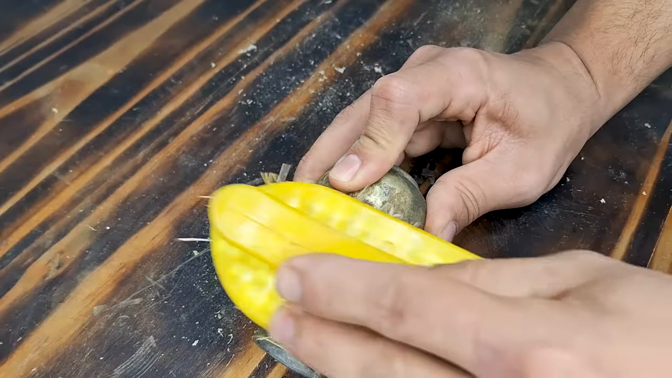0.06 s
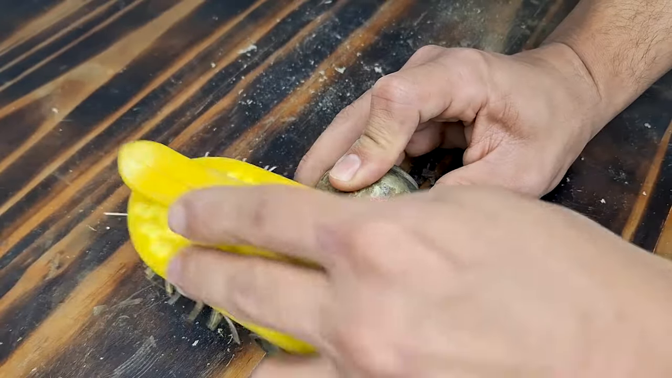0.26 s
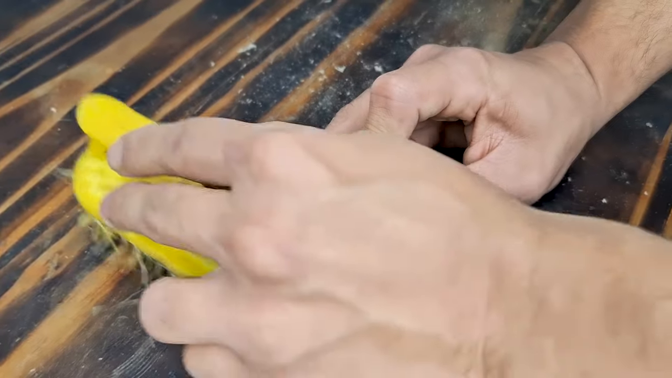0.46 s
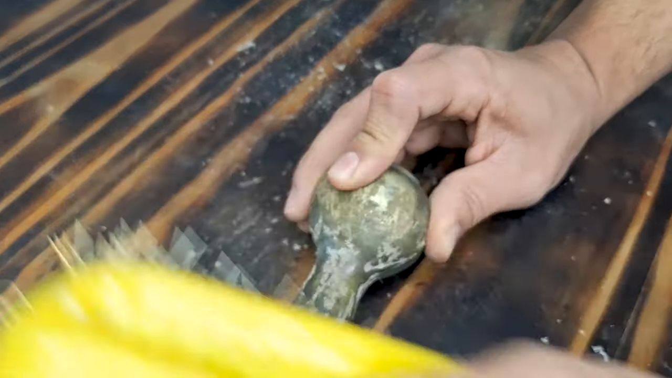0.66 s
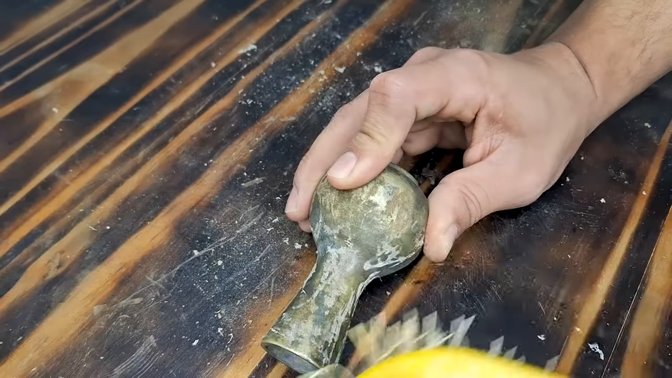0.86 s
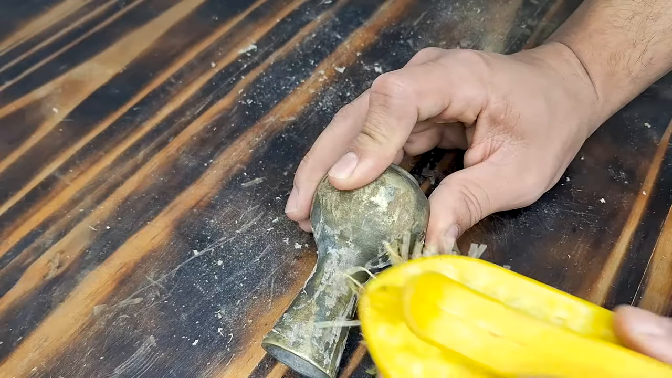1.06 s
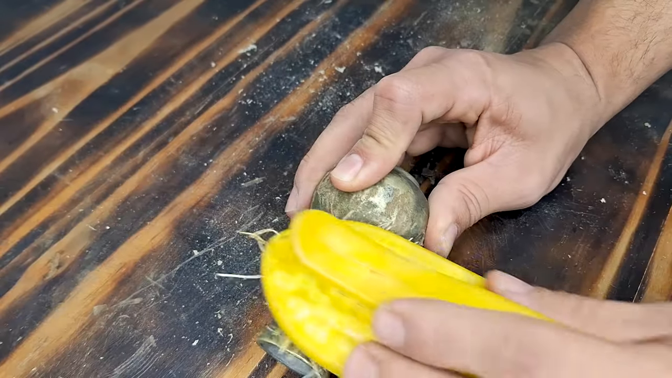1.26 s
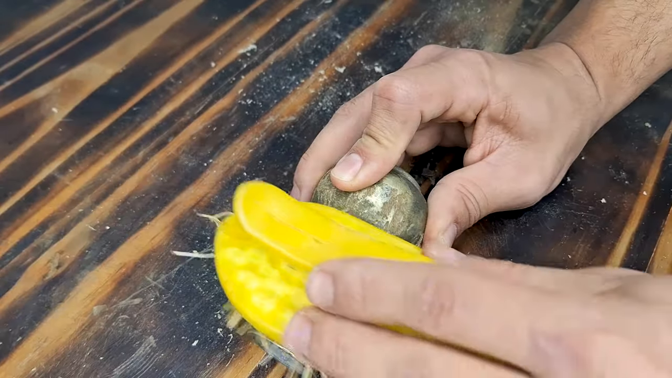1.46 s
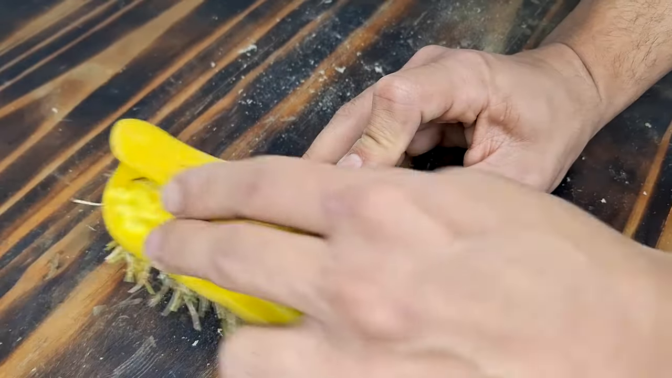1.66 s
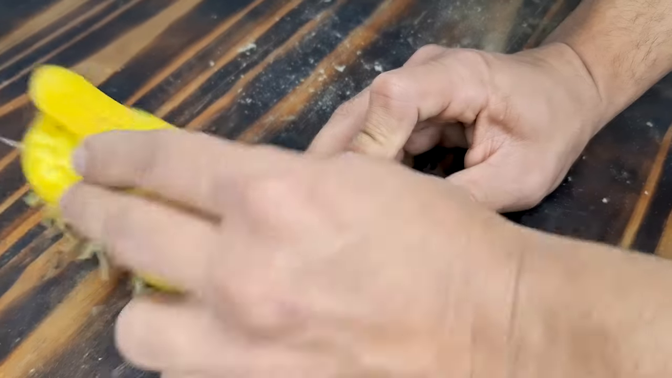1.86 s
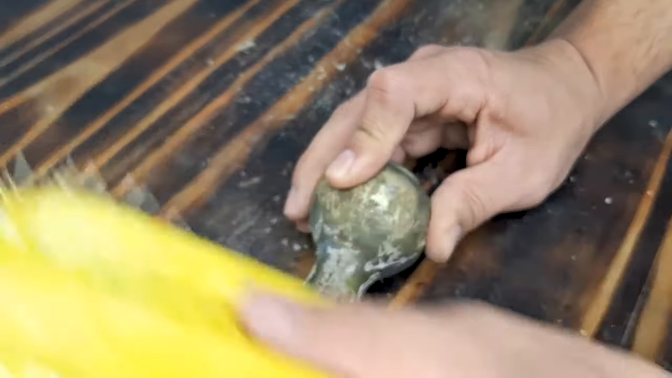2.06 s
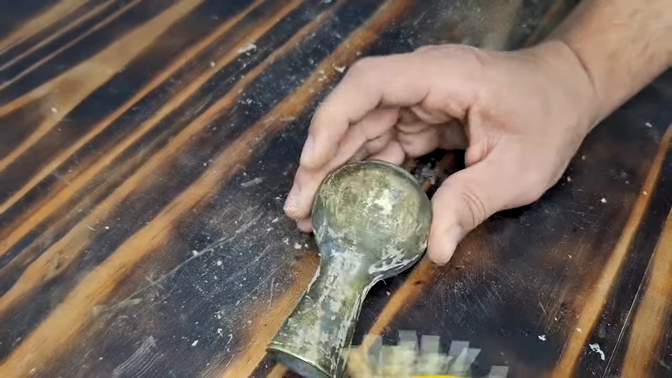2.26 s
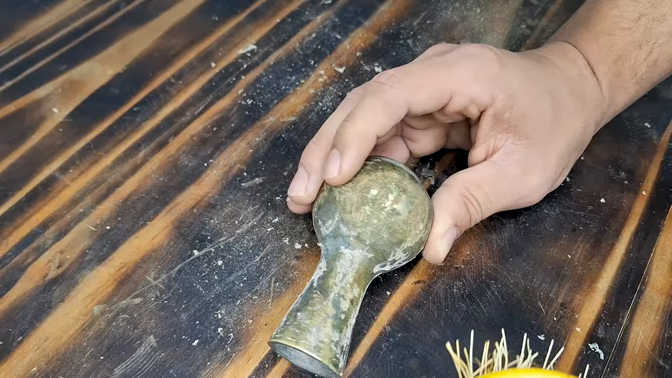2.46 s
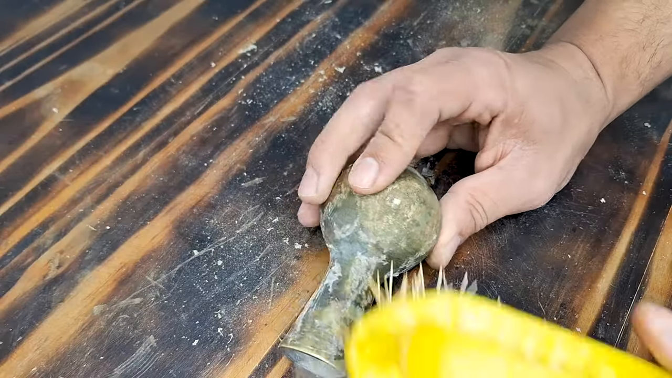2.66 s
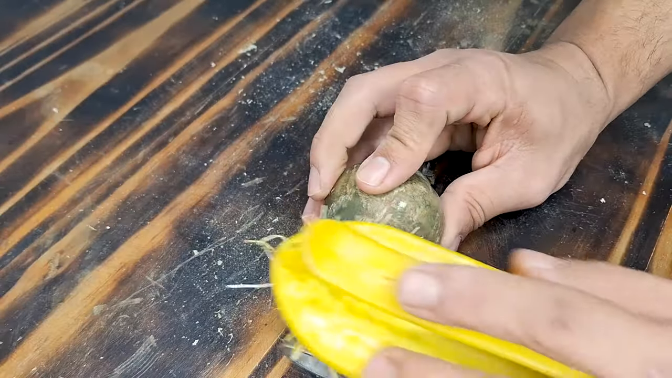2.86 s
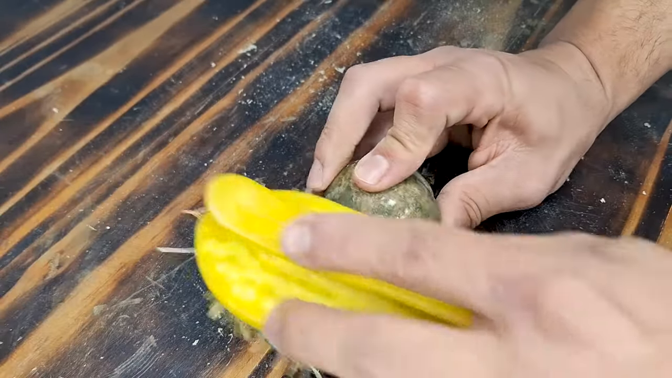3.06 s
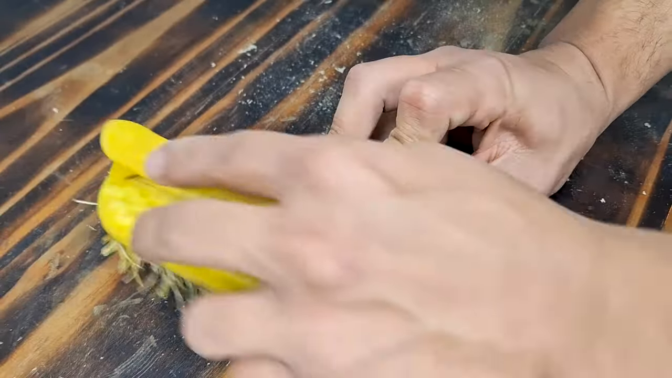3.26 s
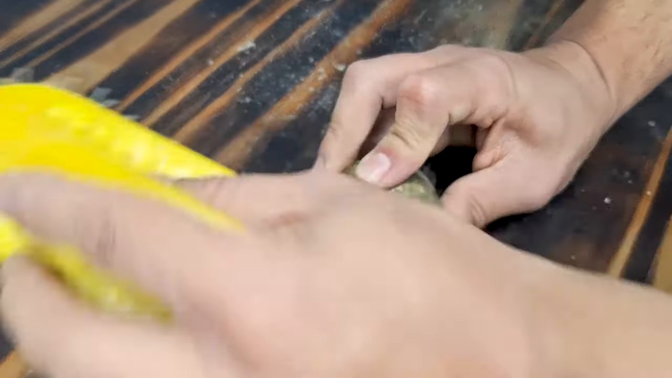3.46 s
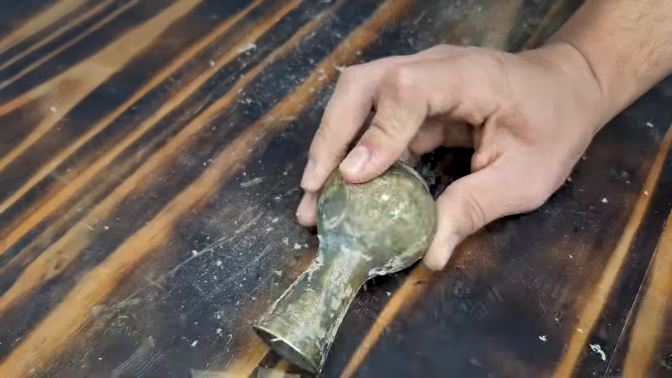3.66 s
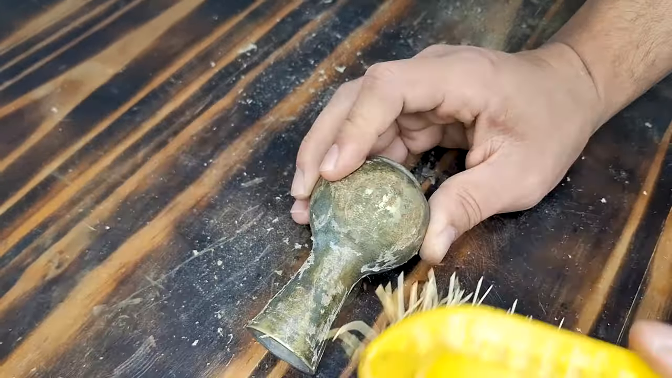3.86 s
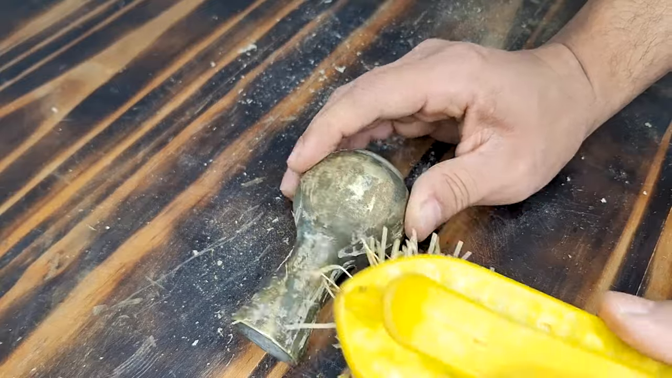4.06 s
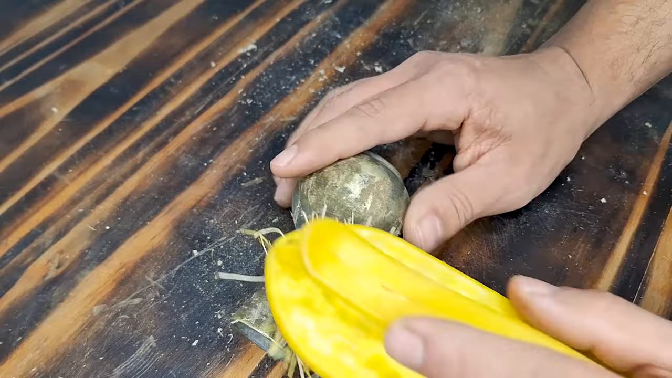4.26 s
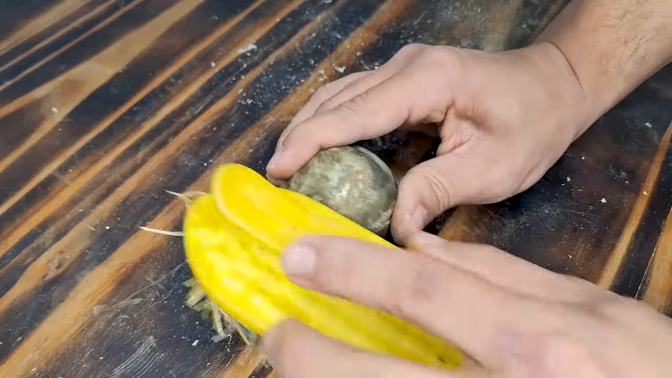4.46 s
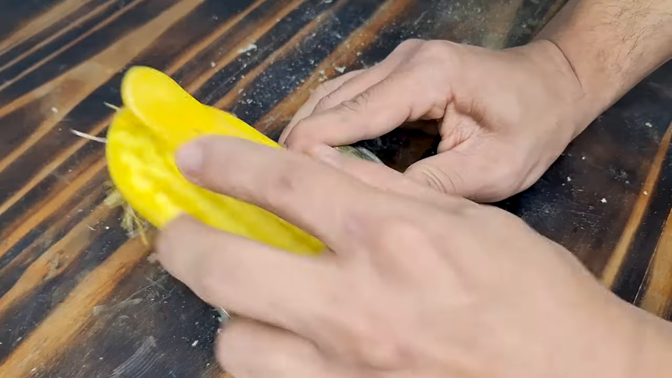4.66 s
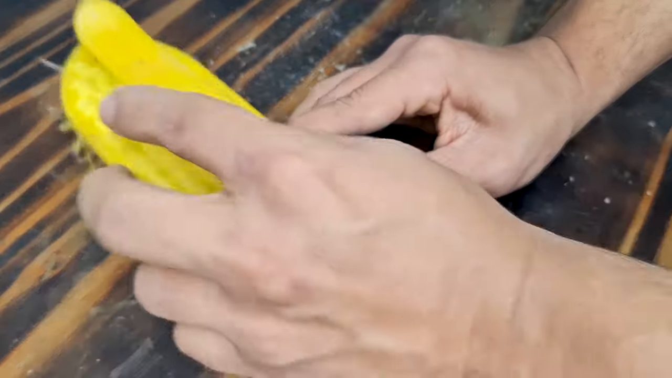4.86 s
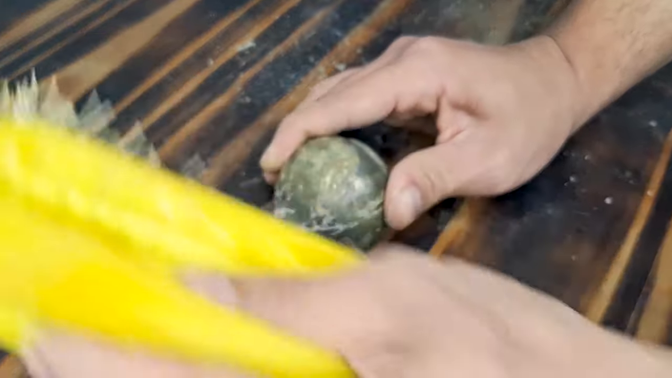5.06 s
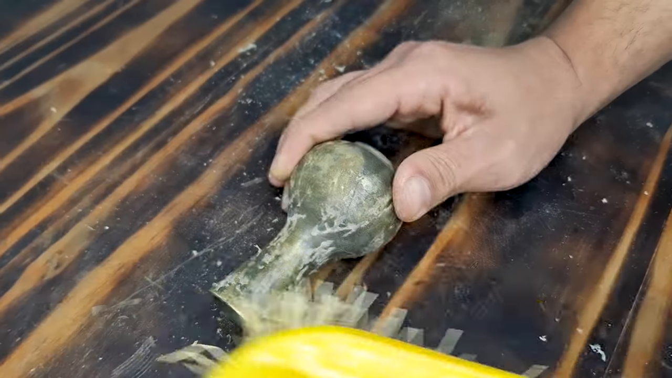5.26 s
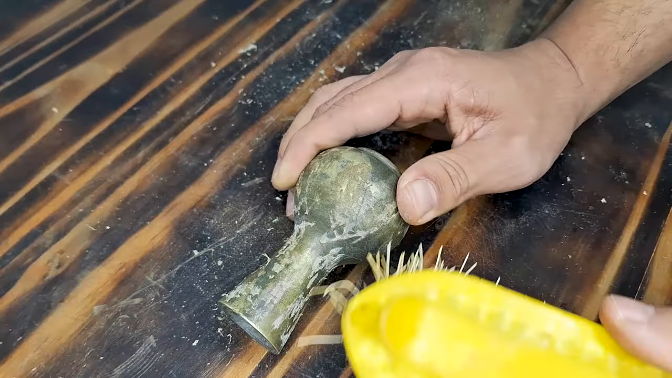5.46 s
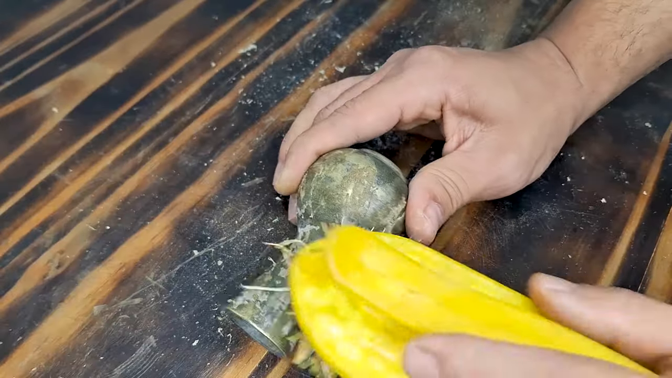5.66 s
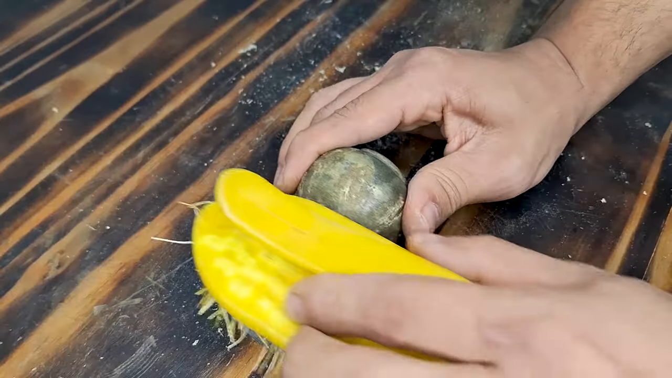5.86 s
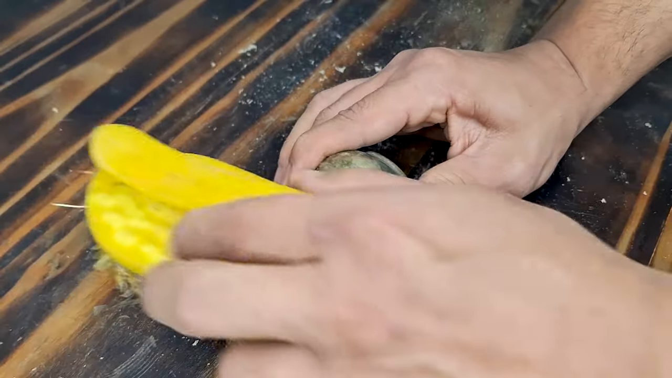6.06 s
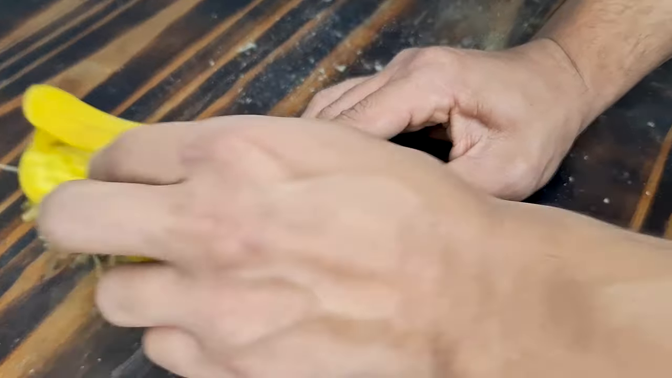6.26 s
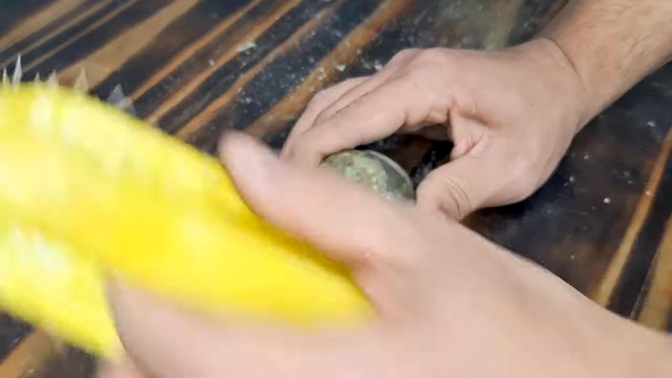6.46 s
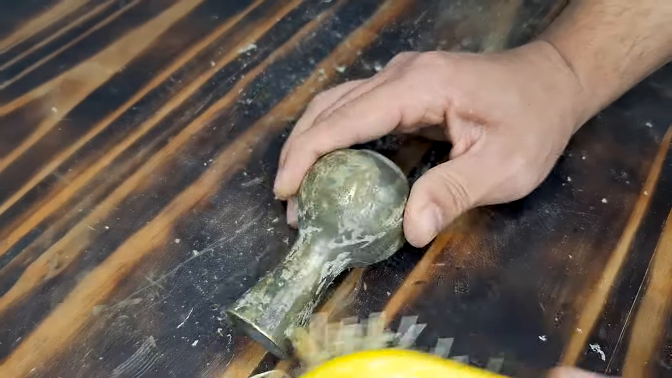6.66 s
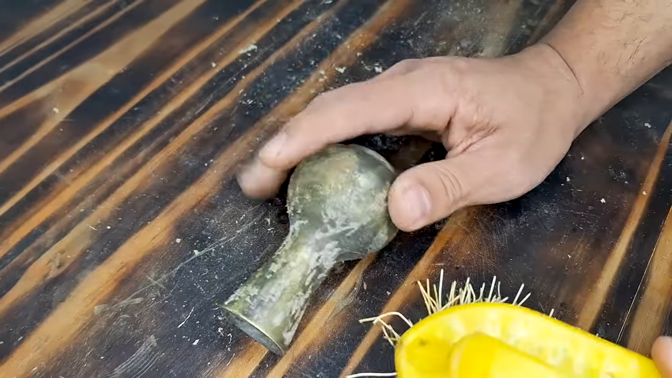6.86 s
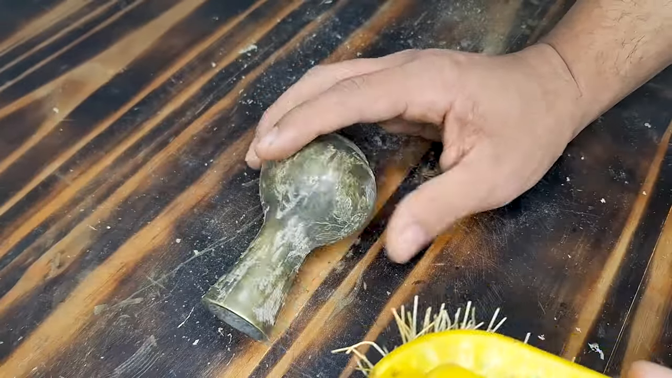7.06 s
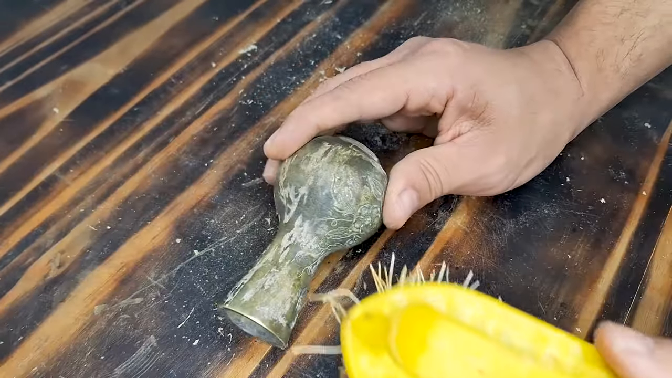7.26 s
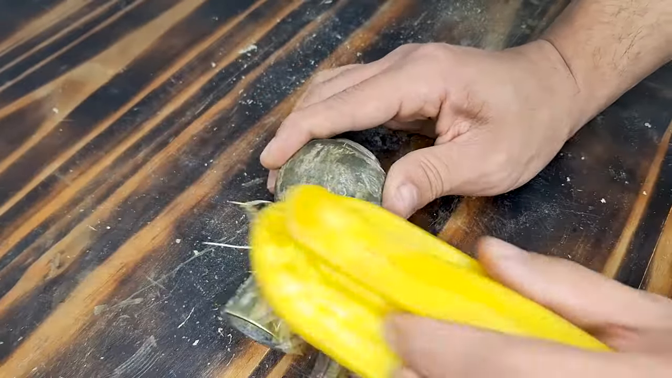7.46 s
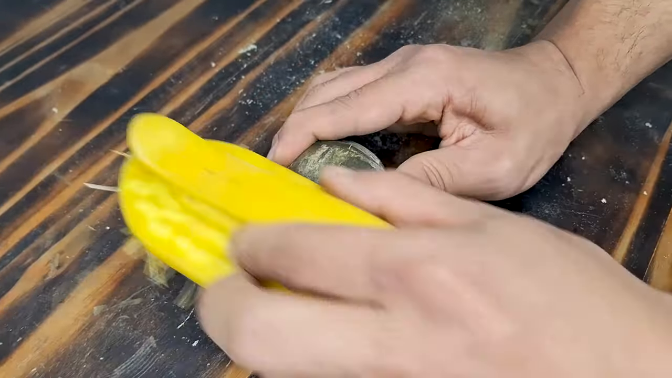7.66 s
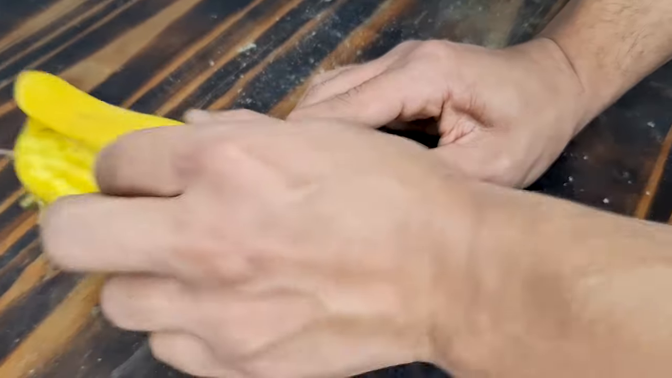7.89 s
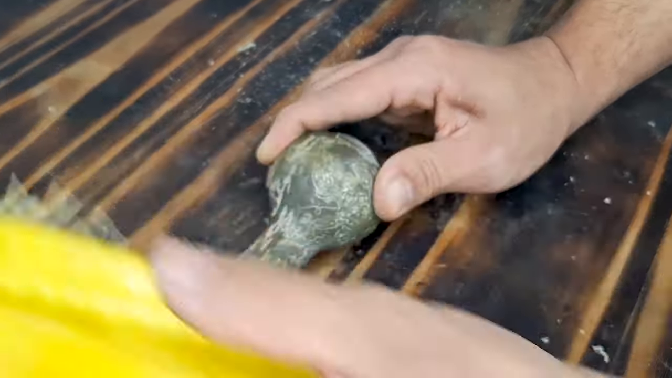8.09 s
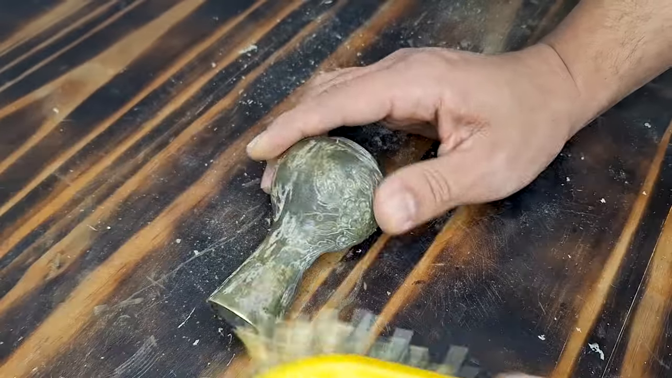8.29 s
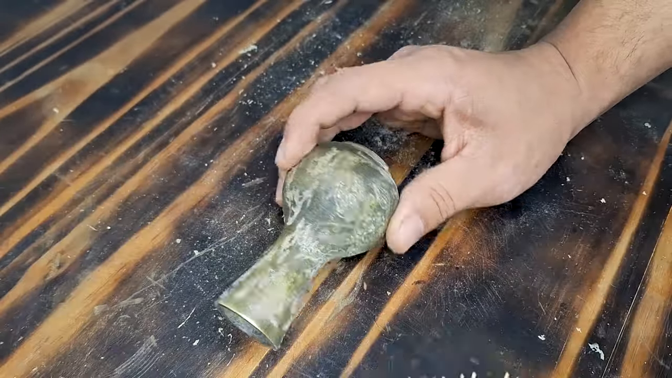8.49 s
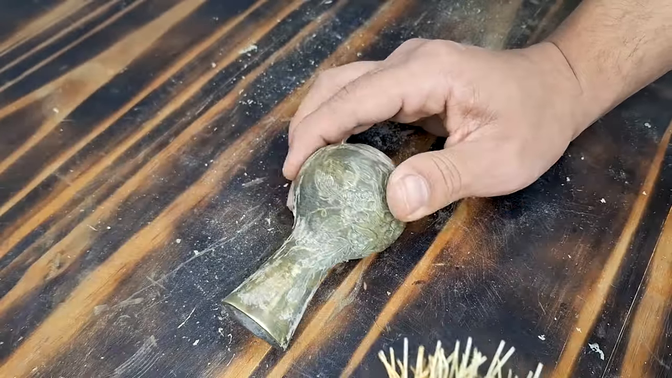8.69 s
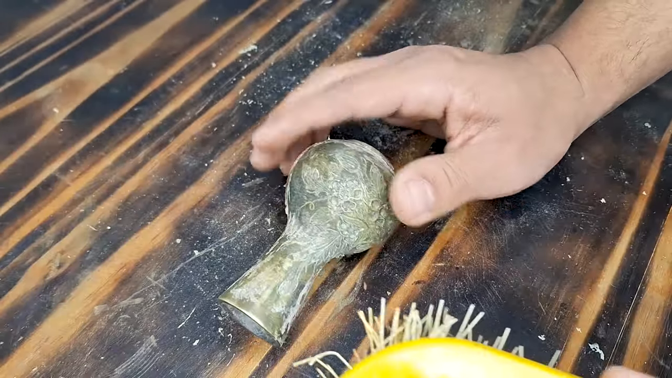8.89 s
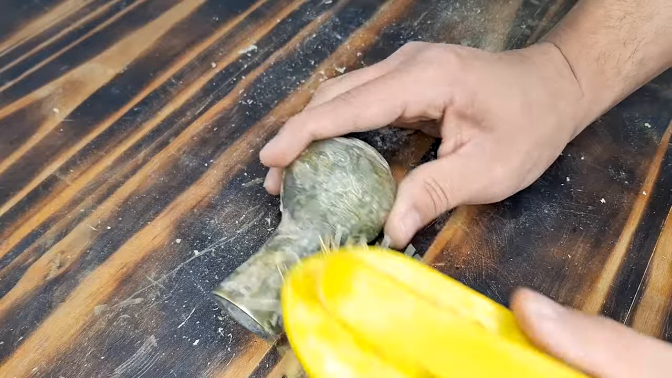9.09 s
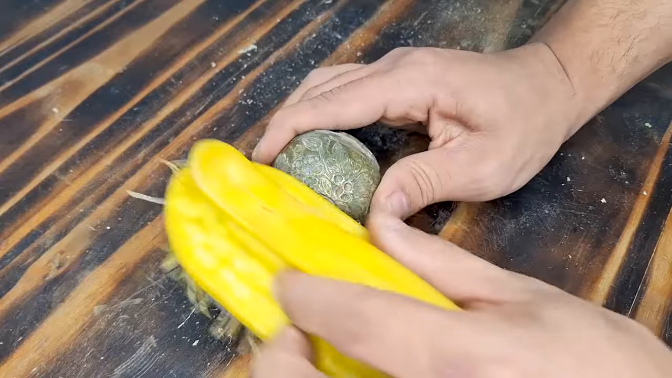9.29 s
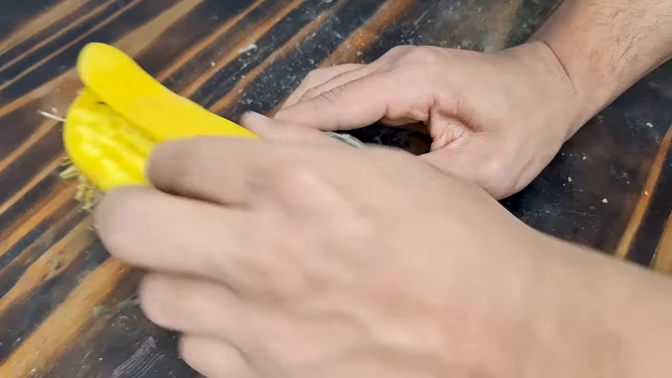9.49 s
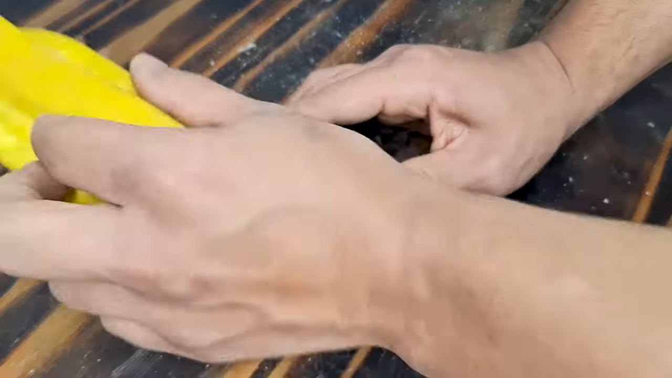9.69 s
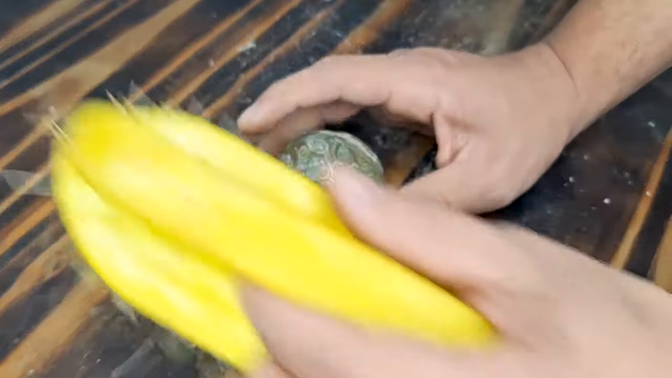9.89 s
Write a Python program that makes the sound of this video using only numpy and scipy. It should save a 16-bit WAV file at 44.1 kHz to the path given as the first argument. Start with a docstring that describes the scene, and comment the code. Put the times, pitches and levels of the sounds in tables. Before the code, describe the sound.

A stiff wire brush rasps over a small brass vase in seven separate strokes, with dull knocks and small slides on a wooden table.

```python
"""A wire brush scrubs a small brass vase that a hand holds down on a wooden table, in seven strokes.
Stick-slip friction: rows of bristles snap off the metal as noise bursts, make it ring faintly and twang.
Modal radiation: drag, slides and knocks of the vase, turned by the fingers, excite the modes of the table top.
Sliding also rasps and groans; the resting hand rumbles. A small room's diffuse decay and faint air noise
surround it all, heard by a close pair of microphones."""
import sys
import numpy as np
from scipy import signal
from scipy.fft import rfft, irfft
from scipy.io import wavfile
from scipy.ndimage import uniform_filter1d

SR = 44100
rng = np.random.default_rng(int(sys.argv[2]) if len(sys.argv) > 2 else 0)


def dump(signal):
    """Clip the signal to [-1, 1] and save it as 16-bit WAV at the path in sys.argv[1]."""
    limited = np.clip(np.atleast_2d(signal).T, -1, 1)
    pcm = np.round(limited * 32767).astype(np.int16)
    wavfile.write(sys.argv[1], SR, pcm)


N = 437898
TIME = np.arange(N) / SR

# All source levels below are relative, ahead of the mix.
# forward strokes of the brush: (first touch [s], time to full pressure [s], time in contact [s],
#   bristle level [dB], first touch against full pressure [dB], force shaking the table [dB],
#   tuft rows passing [1/s], their pulsing [dB], brass ring left behind [dB])
STROKES = [(0.0, 0.178, 0.56, -42, -12.5, -39.5, 22.5, 0.7, -61),
           (1.249, 0.38, 0.69, -41, -30, -37, 23.7, 1.4, -56),
           (2.868, 0.32, 0.58, -39, -24.5, -40, 31, 1, -54),
           (4.294, 0.34, 0.69, -43, -27.5, -41.5, 20.7, 2.5, -72),
           (5.719, 0.31, 0.67, -41.5, -34, -39, 32, 0.9, -73),
           (7.517, 0.17, 0.5, -39.5, -20, -37, 29, 1.5, -60),
           (9.257, 0.14, 0.47, -40, -23.5, -38, 30, 1, -72)]
# single wires catch on the rim and snap free: (time [s], level [dB])
CATCHES = [(0.03, -26), (0.055, -21), (0.104, -18.5), (1.256, -35), (1.298, -32), (1.308, -34),
           (1.328, -34), (1.339, -35), (1.354, -26.5), (1.481, -44), (1.512, -39.5), (1.523, -30),
           (1.556, -21), (2.872, -36), (2.887, -30.5), (2.897, -24.5), (2.915, -26.5), (3.063, -31),
           (3.071, -21.5), (4.356, -30.5), (4.377, -30), (4.422, -35), (4.506, -25), (4.552, -31),
           (5.81, -40), (5.859, -30.5), (7.566, -32), (9.143, -46), (9.263, -40)]
# a stray wire is bowed by the brass: (time [s], level against the bristles [dB])
STRAY_WIRE = [(0, 0), (.4, -8), (1.5, 0), (3.0, -1), (4.4, -8), (9.9, -1)]
# resonances of the loose wires: (frequency [Hz], level [dB], T60 [s])
WIRE_MODES = [(2256, 1.5, .014), (2460, 1.5, 0.014), (2330, -21, 0.25)]
# a loose wire springs free and twangs: (time [s], frequency [Hz], peak level [dB])
TWANGS = [(0.002, 2390, -55), (0.054, 2380, -47), (0.104, 2288, -38.5), (2.872, 2440, -62),
          (3.06, 2330, -61), (3.14, 2340, -44), (3.445, 2420, -43)]
# wires or grit flick the brass: (time [s], level into lower mode pair [dB], level into upper pair [dB])
FLICKS = [(1.256, -48, -39), (1.355, -46, -56), (1.42, -43, -58), (1.643, -28, -56), (2.875, -61, -52),
          (3.702, -58, -47), (4.062, -50, -62), (4.113, -46.5, -68), (4.356, -61, -62.5), (4.421, -50, -57),
          (5.41, -66, -56), (7.287, -39.5, -41), (7.325, -46.5, -38.5), (8.244, -66, -56),
          (8.595, -51, -43), (8.622, -48, -40), (8.653, -46, -42), (8.706, -65, -56)]
# brass modes: two ringing pairs, damped by the fingers, then broad ones that only the scraping foot
#   wakes: (frequency [Hz], level [dB], T60 [s])
VASE_MODES = [(7010, 0, 0.1), (7090, -11, 0.092), (7670, -10, 0.36), (7760, -3.5, 0.075),
              (1544, 11.5, 0.023), (1850, 7.5, 0.014), (2850, 10, 0.028), (4620, 11.5, 0.028),
              (5100, 8.5, .015), (5620, 9, .02), (9300, 6.5, .01)]
# table top modes: (frequency [Hz], level [dB], T60 [s])
TABLE_MODES = [(73, -21.5, 0.25), (87, -6.5, 0.13), (147, -1.5, 0.53), (181.7, -10.5, 0.68),
               (237.3, 5.5, 0.32), (262.6, -1.5, 0.34), (282, -14.5, 0.5), (337.8, -1.5, 0.3),
               (375.4, -1, 0.45), (417.5, 1, 0.39), (484.7, -3.5, 0.37), (595, -2, 0.3), (627.6, 3.5, 0.27),
               (642, -7, 0.31), (721, 1.5, 0.075), (764.2, 4.5, 0.22), (757, 5, 0.034),
               (1032.5, -6.5, 0.49), (1065, -5.5, 0.42), (1134, -9.5, 0.34), (1311, -15, 0.41),
               (1400, -18, 0.13), (1583, -7.5, 0.49), (2100, -3, 0.5), (2300, 0, 0.32), (2320, -0.5, 0.35),
               (2780, 5, 0.12)]
# vase and hand knock on the table: (time [s], peak level [dB], contact bandwidth [Hz])
KNOCKS = [(1.28, -33.5, 540), (1.681, -23.5, 348), (2.041, -36, 140), (2.095, -41, 150), (2.2536, -21, 680),
          (2.286, -28, 605), (2.708, -46.5, 127), (3.526, -45, 110), (3.7017, -16.5, 1215),
          (4.061, -43, 1300), (4.1125, -13, 1066), (4.469, -28, 880), (5.155, -30.5, 372),
          (5.271, -31, 310), (5.367, -30, 338), (5.831, -32.5, 450), (6.514, -33.5, 537),
          (6.986, -29.5, 192), (7.265, -24, 166), (7.285, -8, 1280), (7.396, -17, 330), (8.2446, -16, 1090),
          (8.743, -16.5, 230), (8.7446, -32, 1307), (9.071, -44.5, 107), (9.308, -22.5, 700)]
# the vase slides on the wood, turned by the fingers or shoved by the brush:
#   (time [s], length [s], rasp level [dB], force shaking the table [dB])
SLIDES = [(2.407, 0.13, -68, -41.5), (2.66, 0.019, -73, -83), (2.88, 0.26, -75, -40.5),
          (3.75, 0.02, -70.5, -50), (3.863, 0.13, -81.5, -47.5), (3.98, 0.095, -66, -45),
          (4.448, 0.13, -50, -32), (4.951, 0.019, -76, -33), (5.136, 0.043, -62.5, -38),
          (5.253, 0.079, -80, -42.5), (5.338, 0.06, -71.5, -42), (5.697, 0.026, -87, -48),
          (5.846, 0.1, -66, -38), (6.386, 0.046, -86, -42.5), (6.843, 0.048, -78.5, -58.5),
          (7.018, 0.085, -80.5, -56.5), (7.214, 0.045, -55, -32.5), (7.273, 0.048, -59.5, -36),
          (7.45, 0.16, -81, -39.5), (8.565, 0.036, -64, -39.5), (8.606, 0.06, -59, -38),
          (8.857, 0.05, -82, -72.5), (9.115, 0.025, -76.5, -50.5)]
# the vase or a finger sticks and slips at a steady rate, as a short groan or squeak:
#   (time [s], length [s], frequency [Hz], level [dB])
GROANS = [(0.42, 0.33, 176, -47), (2.423, 0.14, 233.6, -40.5), (3.868, 0.22, 240, -53),
          (4.013, 0.053, 147.3, -42.5), (4.234, 0.11, 177.4, -48.5), (4.237, 0.11, 377.3, -48.5),
          (5.323, 0.054, 6950, -71), (6.757, .36, 1626, -83.5), (6.847, 0.15, 1165, -79),
          (7.534, 0.063, 1410, -58), (8.555, 0.22, 369, -45)]
# low rumble from the hand resting on the table: (time [s], level [dB])
HAND = [(0.0, -43.5), (0.5, -59), (0.9, -60.5), (1.7, -53), (2.8, -57), (4.2, -52.5), (5.0, -50.5),
        (5.6, -62.5), (6.2, -59), (6.7, -58.5), (7.9, -52.5), (9.93, -59)]
# spectra of bristles, table slap and room, drag, rasp, hand rumble and air: (frequency [Hz], level [dB])
BRISTLE_SPECTRUM = [(300, -18.5), (900, 5), (1100, 1.5), (1400, -2), (2300, 3), (2750, 0.5), (3150, -4.5),
                    (3600, -5), (4100, 0.5), (5200, -1.5), (7100, 5), (8100, 1.5), (9400, 6), (10300, -1),
                    (15000, 4.5)]
BOARD_SPECTRUM = [(30, -32.5), (65, -1.5), (200, -5.5), (370, 2), (530, -5), (740, -0.5), (1050, -12.5),
                  (1250, -19.5), (1560, -11), (1800, -14), (2300, -5.5), (3500, -3.5), (8000, -13),
                  (16000, -42)]
DRAG_SPECTRUM = [(30, -15.5), (45, -9), (68, 2), (130, 2), (190, 1.5), (250, -2.5), (500, -0.5), (800, -4),
                 (1300, -4.5), (2500, -23.5), (8000, -64)]
RASP_SPECTRUM = [(200, 0), (900, 9.5), (1400, 15.5), (2000, 12.5), (2600, 7.5), (3600, 2.5), (4750, 4.5),
                 (5800, 2.5), (6600, 1), (9500, -5), (11000, -12.5), (16000, -24)]
RUMBLE_SPECTRUM = [(25, -33.5), (50, -6.5), (72, 7.5), (95, -3.5), (150, -5.5), (250, -11.5), (600, -27.5),
                   (2000, -45), (8000, -48)]
AIR_SPECTRUM = [(30, 23), (200, 27.5), (700, 21.5), (1500, 4.5), (4000, 4), (10000, -4.5), (13000, -26),
                (16000, -41.5)]
# metal sound reaching the right microphone, shaded by the hand: (frequency [Hz], gain [dB])
SHADE = [(500, -2), (3000, -1), (5000, 2), (6200, -0.5), (7000, -9.5), (8200, -14.5), (9500, -31),
         (11000, -12.5), (13000, -10), (15700, -3)]
# likeness of the two microphones: (frequency [Hz], coherence [0-1])
LIKENESS = [(100, 0.92), (350, 1), (600, 0.37), (1200, 0.3), (2200, 0.55), (4000, 0.02), (15000, 0.2)]

TOUCH_S, SWELL_POWER = 0.021, 1.48   # the wires land, then the pressure builds ever faster
ARCH_DB, TIRE_DB = 1.6, 3   # hardest in mid-stroke, easing towards the end
LIFT_DB_PER_S = 438   # the brush leaves the brass
# the table takes this share of the swell, with its own arch and release
DRAG_FOLLOWS, DRAG_ARCH_DB, DRAG_LIFT_DB_PER_S = 0.54, 3.5, 348.5
ROCK_ARCH_DB = 0.5   # the table rocks most in mid-stroke
ROW_SHARPNESS = 0.19   # each row bites briefly, then lets go for longer
TWANG_T60_S = 0.11
LIFT_RING_HZ, LIFT_RING_T60_S = 7660, 0.51   # the brass rings freely once the wires let go
# a slide breaks loose, slows, and stops
SLIDE_ATTACK_S, SLIDE_FADE_DB_PER_S, SLIDE_STOP_DB_PER_S = 0.024, 34, 255
ROOM_T60_S, TREBLE_T60_S = 0.44, 0.35
CUTOFF_HZ = 15850


def bristles(strength, room_db=-11.5, spray_db=-8.5, spray_s=0.00017, friction_db=-2.0,
             free_below=0.23, dull_db=-9.0, bright_hz=7500):
    """Stick-slip friction: wires rub and snap off the brass; greater pressure gives denser, brighter snaps."""
    pressure = strength / strength.max()
    # within the rows, tufts grip and let go at random
    grip_db = 1.66 * np.tanh(drift(110)) + 1.5 * np.tanh(drift(26))
    judder = rows_passing() * from_db(grip_db)
    snap_rate = 650 + 3000 * pressure
    snaps = strength * judder * slips(snap_rate, spread_db=2.5, clump_db=2.5, clumps_per_s=330)
    for s, db in CATCHES:
        snaps[round(s * SR)] += from_db(db)

    # each snap sets its neighbours rattling for a moment
    fade = np.exp(-TIME[:SR // 100] / spray_s)
    rattle = from_db(spray_db) * np.sqrt(np.abs(through(snaps ** 2, fade / fade.sum())))
    friction = from_db(friction_db) * strength * judder
    near = tufts(snaps) + np.hypot(rattle, friction) * diffuse(N)

    low = butter(near, bright_hz, "low", order=1)
    near = low + (near - low) * from_db(dull_db * (2.0 - np.sqrt(pressure)))
    loose = strength / np.sqrt(1 + (pressure / free_below) ** 2)   # pressed wires damp each other
    near = near + stray_wire(loose)
    lag = round(.00018 * SR)   # the brush is nearer the left microphone
    near = np.array([near[0], np.pad(near[1], (lag, 0))[:N]])
    return colour(near + from_db(room_db) * through(near, room_tail()), BRISTLE_SPECTRUM), snaps


def stroke_gains():
    """Contact force: each stroke lands, swells, arches and lifts; gains of bristles, drag and table rocking."""
    scrub, drag, rock = 0, 0, 0
    for s, swell_s, contact_s, db, touch_db, force_db, *_ in STROKES:
        t = TIME - s
        landed = np.clip(t / TOUCH_S, 0, 1) ** 2
        lifted_s = np.maximum(t - contact_s, 0)
        swell_db = touch_db * (1 - np.clip(t / swell_s, 0, 1) ** SWELL_POWER)
        along = np.clip((t - swell_s) / (contact_s - swell_s), 0, 1)
        arch = np.sin(np.pi * along)
        scrub_db = db + swell_db + ARCH_DB * arch - TIRE_DB * along - LIFT_DB_PER_S * lifted_s
        drag_db = force_db + DRAG_FOLLOWS * swell_db + DRAG_ARCH_DB * arch
        drag_db = drag_db - TIRE_DB * along - DRAG_LIFT_DB_PER_S * lifted_s
        force = landed * from_db(drag_db)
        scrub = scrub + landed * from_db(scrub_db)
        drag = drag + force
        rock = rock + force * from_db(ROCK_ARCH_DB * (arch - 2.5))
    return scrub, drag, rock


def rows_passing():
    """Periodic modulation: the tufts stand in rows, so a stroke pulses as row after row crosses the vase."""
    db = np.zeros(N)
    for s, swell_s, contact_s, *_, rows_per_s, pulse_db, _ in STROKES:
        turn = 2 * np.pi * rows_per_s * (TIME - s - swell_s)
        touching = (TIME > s) * (TIME < s + contact_s)
        db += pulse_db * (np.cos(turn) + ROW_SHARPNESS * np.cos(2 * turn)) * touching
    return from_db(db)


def slips(per_s, spread_db, clump_db, clumps_per_s):
    """Random impulse process: snaps of uneven size that come in clumps, at about constant mean power."""
    sizes = from_db(spread_db * np.minimum(rng.exponential(1, N), 4)) * rng.choice([-1, 1], N)
    happens = rng.random(N) < per_s / SR
    snaps = sizes * happens * from_db(clump_db * drift(clumps_per_s))
    return snaps / np.sqrt(np.abs(uniform_filter1d(snaps ** 2, SR // 12)) + 1e-6)


def tufts(snaps, scatter_s=0.0016, swap_db=7.5, swaps_per_s=18, count=10):
    """Impulse response: each tuft answers snaps with fine resonances of its own; the tufts take turns."""
    at = np.flatnonzero(snaps)
    shares = np.array([from_db(swap_db * drift(swaps_per_s)[at]) for _ in range(count)]) ** 2
    odds = np.cumsum(shares / shares.sum(axis=0), axis=0)
    dealt = (rng.random(N)[at] > odds).sum(axis=0)   # the tuft that makes each snap
    out, t = 0, TIME[:SR // 20]
    for k in range(count):
        burst = rfft(diffuse(len(t)) * np.exp(-t / scatter_s))
        broad_power = uniform_filter1d(np.abs(burst) ** 2, size=100)
        burst = irfft(burst / np.sqrt(broad_power))   # even on the broad scale
        own = np.zeros(N)
        own[at[dealt == k]] = snaps[at[dealt == k]]
        out = out + through(own, burst)
    return out


def stray_wire(strength):
    """Bowed resonance: loosely held wires sing as they are dragged along, and ring on after the stroke."""
    unsteady = from_db(-7.0 + 5.3 * drift(40))
    bowing = strength * gain_curve(STRAY_WIRE) * unsteady * rng.standard_normal(N)
    return through(bowing, ringing(WIRE_MODES, port_s=.00003))


def twangs():
    """Free vibration: each released wire rings out at its own pitch."""
    return pings(TWANGS, TWANG_T60_S)


def vase(snaps, lower_db=-17.5, upper_db=-19.0, flick_db=11.5):
    """Modal excitation: bristles and flicks ring the brass; the spot touched decides which pair sounds."""
    out = 0
    for k, scrub_db in enumerate((lower_db, upper_db)):
        drive = from_db(scrub_db) * snaps
        for s, *pair_db in FLICKS:
            drive[round(s * SR)] += from_db(pair_db[k] + flick_db)
        out = out + through(drive, ringing(VASE_MODES[2 * k:2 * k + 2], port_s=.00002))
    return out


def after_rings():
    """Free decay: the last wires pluck the vase as the brush lifts."""
    plucks = [(s + contact_s, LIFT_RING_HZ, ring_db) for s, _, contact_s, *_, ring_db in STROKES]
    return pings(plucks, LIFT_RING_T60_S)


def shudder(table, force, grain):
    """Forced vibration: friction shakes the table top, which radiates through its modes."""
    response = colour(table, DRAG_SPECTRUM)
    energy = np.sum(butter(response.mean(axis=0), [250, 1200], "band") ** 2)
    return through(force * grain, response / np.sqrt(energy))


def table_response(slap_db=11.0, bounce_loss_db=4.5, bounce_s=.0043, slap_top_hz=1500, room_db=13.0, count=4):
    """Edge reflection: the slap returns inverted from the board's edges, joined by its modes and the room."""
    slap, trips = np.zeros(SR), np.arange(count)
    arrivals = np.round(trips * bounce_s * SR).astype(int)
    slap[arrivals] = -(-1) ** trips * from_db(slap_db - bounce_loss_db * trips)
    slap = butter(slap, [170, slap_top_hz], "band", order=1)
    broad = colour(slap + from_db(room_db) * room_tail(), BOARD_SPECTRUM)
    return ringing(TABLE_MODES, port_s=0.0001) + broad


def knocks(table, rebound=0.2, edge_db=-33.5, tick_db=-23.5, tick_s=0.0012, tick_top_hz=3600):
    """Contact time: a soft blow leaves only low modes; a hard one rebounds, moves little bass and ticks."""
    out = np.zeros((2, N + SR))
    tick = butter(diffuse(SR) * np.exp(-TIME[:SR] / tick_s), tick_top_hz, "low")
    hardest_hz = max(row[2] for row in KNOCKS)
    for s, db, contact_hz in KNOCKS:
        edge = from_db(edge_db) * butter(table, contact_hz, "low", order=1)   # first touch of the hard rim
        blow = butter(table, contact_hz, "low", order=4) + edge
        blow = butter(blow, rebound * contact_hz, "high", order=1)
        hard_tick = from_db(tick_db) * (contact_hz / hardest_hz) ** 2 * tick
        start = round(s * SR)
        out[:, start:start + SR] += from_db(db) * (blow / np.abs(blow).max() + hard_tick)
    return out[:, :N]


def slide_gains():
    """Sliding friction: strength of the rasp and of the force on the table over all slides."""
    rasp, force = 0, 0
    for s, length_s, rasp_db, force_db in SLIDES:
        motion = slide_motion(s, length_s)
        rasp = rasp + from_db(rasp_db) * motion
        force = force + from_db(force_db) * motion
    return rasp, force


def slide_motion(s, length_s):
    """Breakaway and damping: a slide starts quickly, fades and stops."""
    t = np.maximum(TIME - s, 0)
    fade_db = SLIDE_FADE_DB_PER_S * t + SLIDE_STOP_DB_PER_S * np.maximum(t - length_s, 0)
    return np.minimum(t / SLIDE_ATTACK_S, 1) ** 2 * from_db(-fade_db)


def scrape(strength, hiss_db=-7.5, brass_db=-3.0, grit_db=-11.0, room_db=-3.0):
    """Abrasive contact: the foot grinds over grit as a rough hiss, sharp ticks, and grains that ring the brass."""
    rough_noise = unit_band(colour(diffuse(N), RASP_SPECTRUM), [3000, 15000])
    hiss = from_db(hiss_db + 2.7 * drift(150)) * rough_noise
    tick = diffuse(SR // 50) * np.exp(-TIME[:SR // 50] / 0.00078)
    ticks = through(slips(220, spread_db=5.0, clump_db=0.5, clumps_per_s=60), tick)
    ticks = from_db(grit_db) * unit_band(colour(ticks, RASP_SPECTRUM), [3000, 15000])
    grains = from_db(brass_db) * slips(1500, spread_db=8.5, clump_db=1.5, clumps_per_s=130)
    ring = through(strength * grains, ringing(VASE_MODES, port_s=.00002))
    near = strength * (hiss + ticks) + ring
    return near + from_db(room_db) * through(near, room_tail())


def groans(waver_hz=10.8, flutter_db=6.5, room_db=-17.0):
    """Self-sustained oscillation: regular sticking and slipping gives a wavering tone."""
    out, waver = 0, waver_hz * np.cumsum(drift(70)) / SR
    for s, length_s, hz, db in GROANS:
        tone = np.sin(2 * np.pi * (hz * TIME + waver))
        out = out + from_db(db) * slide_motion(s, length_s) * tone
    out = out * from_db(flutter_db * drift(67))
    return out + from_db(room_db) * through(out, room_tail())


def hand_rumble(rocking, hand_db, push_db):
    """Low-frequency forcing: the resting hand rumbles on the table, and both hands rock it in the strokes."""
    pushing = gain_curve(HAND) + from_db(push_db) * rocking
    rumble = unit_band(colour(diffuse(N), RUMBLE_SPECTRUM), [40, 200])
    return pushing * from_db(hand_db + 2.8 * drift(11)) * rumble


def room_air(air_db):
    """Stationary noise: the quiet of the room is a steady coloured hiss."""
    return from_db(air_db) * unit_band(colour(diffuse(N), AIR_SPECTRUM), [3000, 15000])


def room_tail():
    """Diffuse reverberation: stereo noise of energy 1 decays exponentially, the treble sooner."""
    t, noise = TIME[:SR], diffuse(SR)
    low = butter(noise, 1200, "low", order=1)
    tail = low * from_db(-60 * t / ROOM_T60_S) + (noise - low) * from_db(-60 * t / TREBLE_T60_S)
    tail = tail * (1 - np.exp(-t / 0.0027))
    return tail / np.sqrt(np.sum(tail ** 2) / 2)


def ringing(modes, port_s, most_turns=0.18):
    """Modal superposition: decaying sines, each with its own small delay between the two microphones."""
    t, out = TIME[:SR], 0
    for k, (hz, db, t60) in enumerate(modes):
        lag = min(port_s, most_turns / hz) * (-1) ** (k // 2) * np.array([[1], [-1]])
        decay = from_db(db - 60 * t / t60)
        out = out + (-1) ** k * decay * np.sin(2 * np.pi * hz * (t - lag))
    return out / np.sqrt(np.sum(out ** 2) / 2)


def pings(rows, t60):
    """Exponential decay: dying tones from rows of (time [s], frequency [Hz], peak level [dB])."""
    out, t = np.zeros(N + SR), TIME[:SR]
    for s, hz, db in rows:
        start = round(s * SR)
        out[start:start + SR] += from_db(db - 60 * t / t60) * np.sin(2 * np.pi * hz * t)
    return out[:N]


def diffuse(size):
    """Spatial coherence: noise at both microphones, its likeness set for each frequency."""
    mid, side = rfft(rng.standard_normal((2, size)))
    alike = np.clip(at_hz(LIKENESS, np.fft.rfftfreq(size, 1 / SR)), 0, 1)
    shared = np.sqrt((1 + alike) / 2) * mid
    opposed = np.sqrt((1 - alike) / 2) * side
    return irfft(shared + opposed * [[1], [-1]], size)


def drift(per_s):
    """Random modulation: a Gaussian wander of spread about 1, joined by straight lines."""
    return np.interp(TIME * per_s, np.arange(N // 20), rng.standard_normal(N // 20))


def gain_curve(points):
    """Amplitude envelope: gain over time from a curve of dB."""
    return from_db(np.interp(TIME, *np.transpose(points)))


def colour(x, spectrum):
    """Minimum-phase filtering: a causal filter with the given spectrum, by way of the cepstrum."""
    size = 4096
    cepstrum = irfft(np.log(from_db(at_hz(spectrum, np.fft.rfftfreq(size, 1 / SR)))))
    cepstrum[1:size // 2] *= 2
    cepstrum[size // 2 + 1:] = 0
    return through(x, irfft(np.exp(rfft(cepstrum))))


def through(x, response):
    """Linear superposition: convolve with an impulse response, keeping the length."""
    return signal.oaconvolve(np.atleast_2d(x), np.atleast_2d(response), axes=1)[:, :x.shape[-1]]


def unit_band(x, band):
    """Level normalisation: scale so that the middle of a stereo sound has rms 1 in a band."""
    return x / butter(x.mean(axis=0), band, "band", order=4).std()


def butter(x, hz, kind, order=2):
    """Band limiting: causal Butterworth filter."""
    return signal.sosfilt(signal.butter(order, hz, kind, fs=SR, output="sos"), x + 1e-18)


def at_hz(points, hz):
    """Spectral interpolation: read a spectrum on a log-frequency axis."""
    knots, values = np.transpose(points)
    return np.interp(np.log(hz + 1), np.log(knots), values)


def from_db(db):
    """Logarithmic level: decibels to amplitude gain."""
    return 10 ** (np.asarray(db) / 20)


def scene(bristle_db=2.5, drag_db=-5.5, slide_db=-5.0, hand_db=-2.5, push_db=-4.0, air_db=-91.5, left_db=1.0):
    """Superposition of sources: brush, vase, table and hand over the quiet of the room."""
    table = table_response()
    scrub, drag_force, rocking = stroke_gains()
    rasping, slide_force = slide_gains()

    hiss, snaps = bristles(scrub)
    metal = from_db(bristle_db) * hiss + vase(snaps) + twangs() + after_rings()
    metal = np.vstack([metal[0], colour(metal[1], SHADE)])

    drag_grain = slips(2500, spread_db=2.5, clump_db=4.5, clumps_per_s=60)
    drag = from_db(drag_db) * shudder(table, drag_force, drag_grain)
    slide_grain = slips(900, spread_db=5.5, clump_db=0.5, clumps_per_s=50)
    slide = from_db(slide_db) * shudder(table, slide_force, slide_grain)
    wood = knocks(table) + drag + slide + groans() + hand_rumble(rocking, hand_db, push_db)
    bass = 0.31 * butter(wood, 120, "low", order=1) * [[1], [-1]]   # the bass leans to the left
    wood = wood * from_db([[left_db / 2], [-left_db / 2]]) + bass
    return metal + scrape(rasping) + room_air(air_db) + wood


def record(dry, low_cut_hz=35):
    """Band limitation: the deepest bass is rolled off and the top is cut steeply."""
    steep_cut = signal.ellip(12, .1, 80, CUTOFF_HZ, fs=SR, output="sos")
    return signal.sosfilt(steep_cut, butter(dry, low_cut_hz, "high", order=3))


dry = scene()
out = record(dry)
dump(out)
```